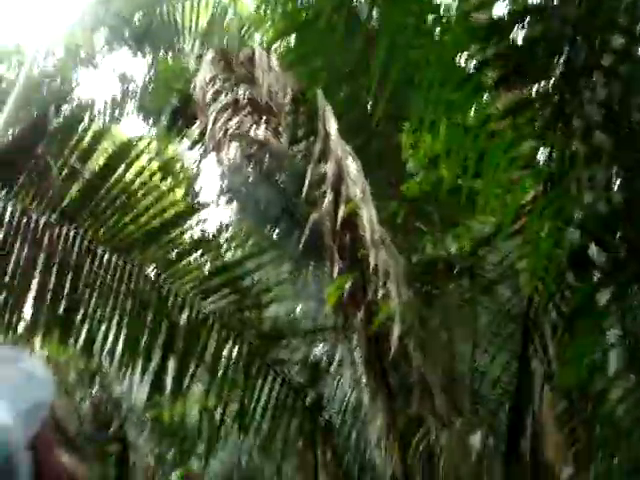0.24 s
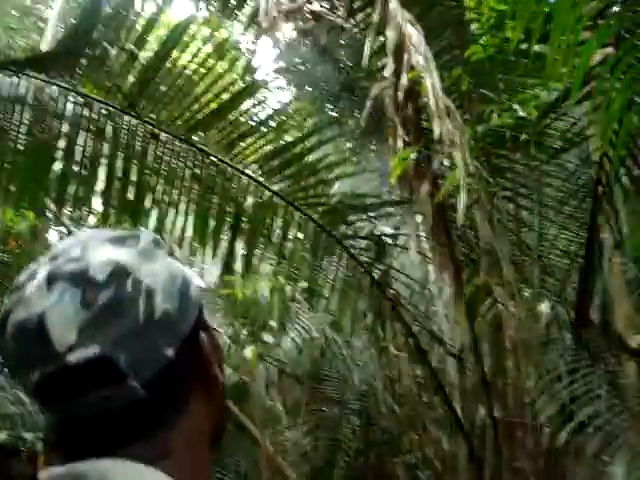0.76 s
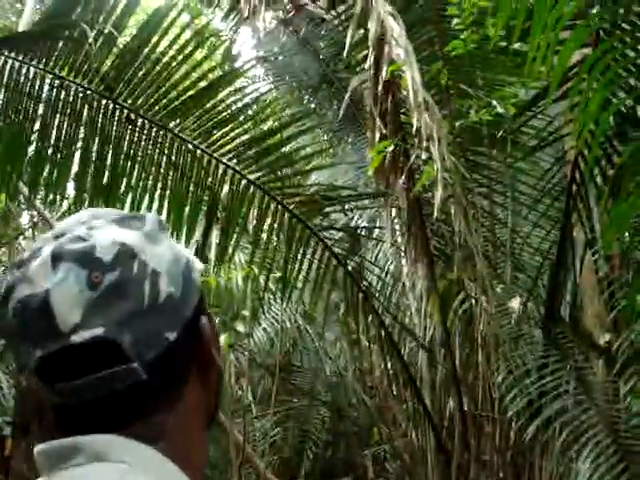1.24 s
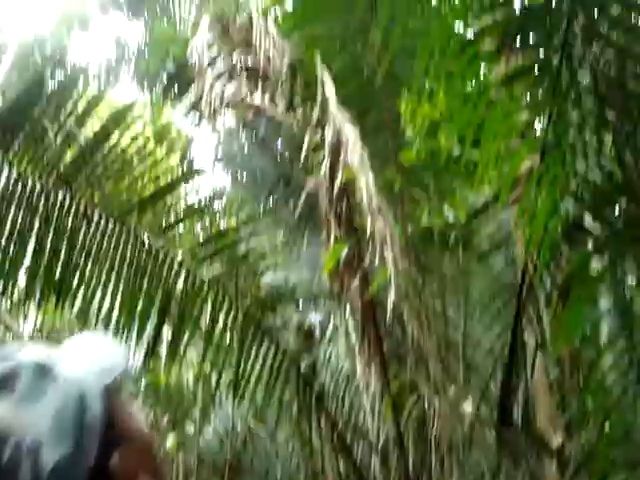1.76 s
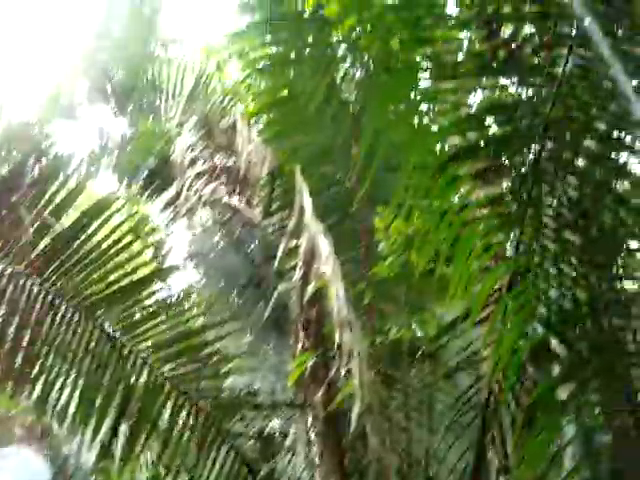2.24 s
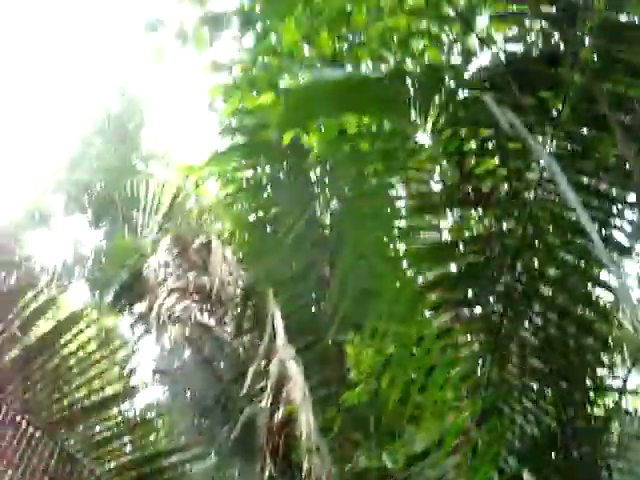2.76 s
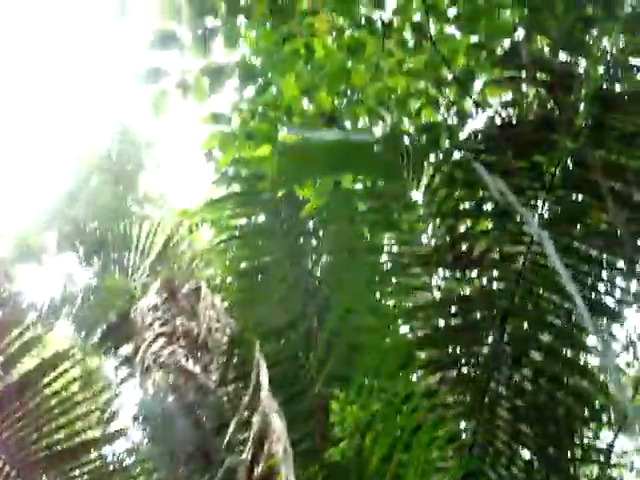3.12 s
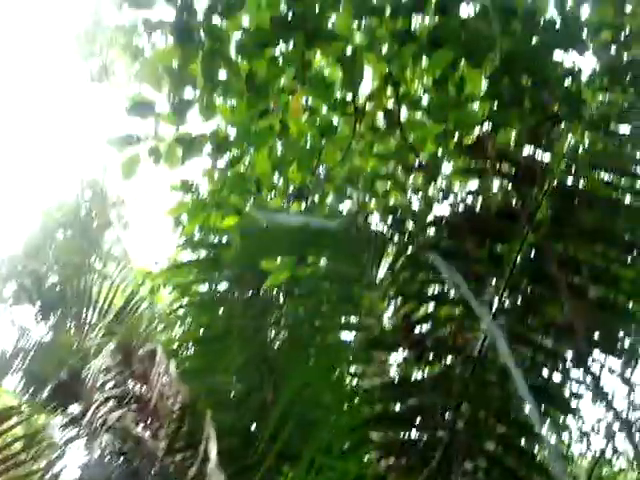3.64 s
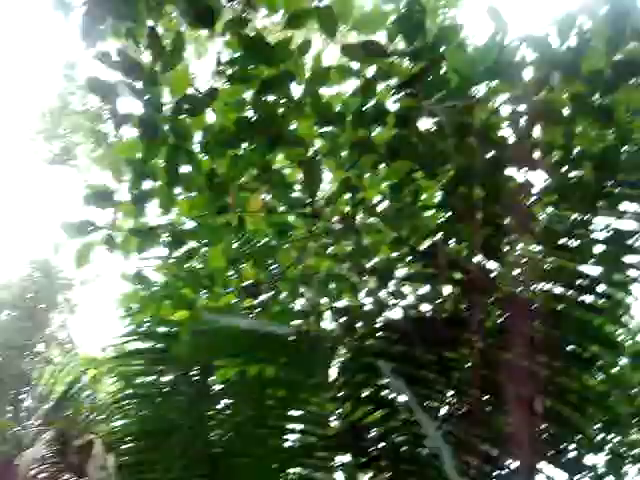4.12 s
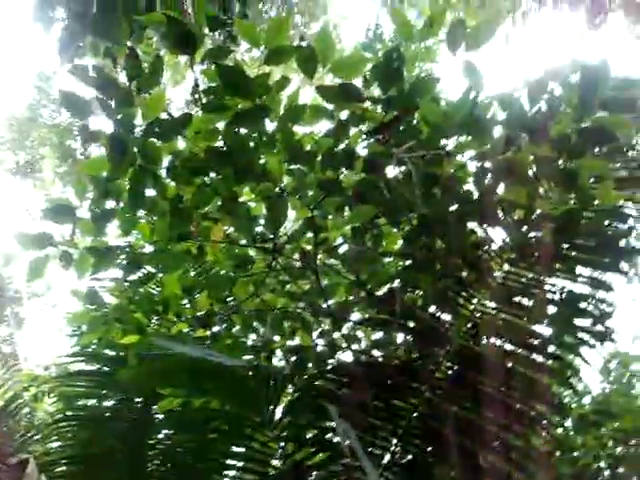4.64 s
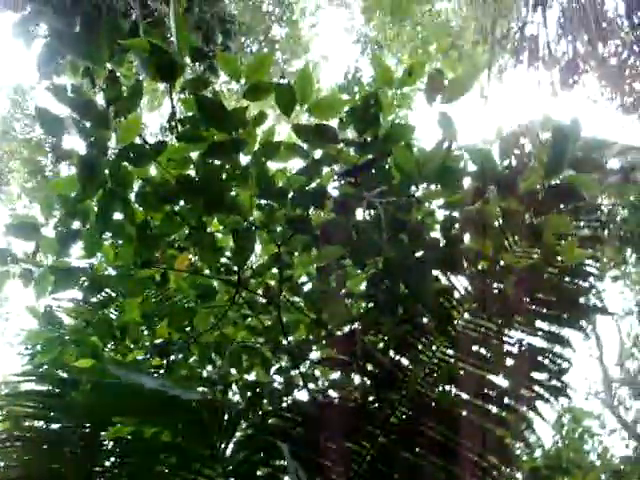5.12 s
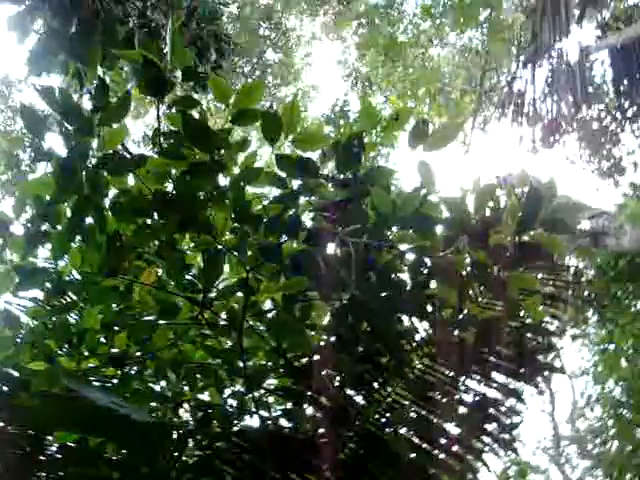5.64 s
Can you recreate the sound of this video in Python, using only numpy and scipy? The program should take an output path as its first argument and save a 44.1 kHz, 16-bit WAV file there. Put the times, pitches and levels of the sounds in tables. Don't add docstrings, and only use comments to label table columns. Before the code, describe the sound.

Outdoors in dense jungle, a small handheld camera catches the tail of a howler monkey roar, then whistling bird notes over close leaf rustle and twig snaps. Low moans and a rough gasp lead to hoarse barks and clear hoots; after a brief dip, a long gravelly roar builds to the end over loud cracks and handling bumps.

```python
import sys
import numpy as np
from scipy import signal
from scipy.io import wavfile
from scipy.ndimage import uniform_filter1d, minimum_filter1d

SR = 44100
rng = np.random.default_rng(int(sys.argv[2]) if len(sys.argv) > 2 else 0)


def voltage_ratio(decibels):
    exponent = np.asarray(decibels, float) / 20
    return 10 ** exponent


def log_audio(samples):
    frames = np.atleast_2d(samples).T
    limited = np.clip(frames, -1, 1)
    pcm = np.round(limited * 32767).astype(np.int16)
    wavfile.write(sys.argv[1], SR, pcm)


N = 259370
T = np.arange(N) / SR

# (time [s], frequency [Hz])
SAC_HZ = [(2.95, 700), (3.5, 720), (4.1, 756), (5.0, 750), (5.6, 744.5), (5.88, 797)]


def evened(x):
    return x / np.sqrt(np.mean(x ** 2) + 1e-20)


def read(points, hz):
    f, value = np.transpose(points)
    return np.interp(np.log(hz + 1), np.log(f + 1), value)


def played(rows):
    s, *columns = np.transpose(rows)
    span = slice(max(round(s[0] * SR), 0), min(round(s[-1] * SR), N))
    since_start_s = T[span] - s[0] + (s[0] < .01)
    to_end_s = s[-1] - T[span] + (s[-1] > T[-1] - .01)
    ends = np.clip(np.minimum(since_start_s, to_end_s) / .015, 0, 1)
    return span, ends, [np.interp(T[span], s, c) for c in columns]


def held(start_s, length_s, rise, fall, *columns):
    return np.transpose([start_s + length_s * np.array([0, rise, 1 - fall, 1]), *columns])


def swells(events, rest_db):
    return rest_db + sum(rise_db * np.exp(-((T - s) / width_s) ** 2) for s, width_s, rise_db in events)


def wobble(count, size):
    return evened(uniform_filter1d(uniform_filter1d(rng.standard_normal(count), size), size))


def coloured(points, patchy_db):
    frames, hz = N // 128 + 5, np.fft.rfftfreq(512, 1 / SR)
    a, b, patches = rng.standard_normal((frames, 257, 3)).T
    patches = evened(uniform_filter1d(uniform_filter1d(patches, 5, 0), 24, 1))
    z = (a + 1j * b) * voltage_ratio(read(points, hz)[:, None] + patchy_db * patches)
    return evened(signal.istft(z, nperseg=512, noverlap=384)[1][:N])


def resonate(x, hz, width_hz):
    r = np.exp(-np.pi * width_hz / SR)
    if np.ndim(hz) == 0:
        return 2 * signal.lfilter([1 - r], [1, -r * np.exp(2j * np.pi * hz / SR)], x).real
    turn = np.exp(2j * np.pi * np.cumsum(hz) / SR)
    return 2 * (turn * signal.lfilter([1 - r], [1, -r], x / turn)).real


def highpass(x, order, hz):
    return signal.sosfilt(signal.butter(order, hz, "high", fs=SR, output="sos"), x)


def folds(count, rate_hz, jitter, puff):
    turns = np.cumsum(rate_hz * np.exp(jitter * wobble(count, size=150))) / SR
    pulses = np.diff(np.floor(turns), prepend=0) * voltage_ratio(2.75 * rng.standard_normal(count))
    puffs = (0.56 + np.exp(-(turns % 1) / 0.43)) * rng.standard_normal(count)
    return evened((1 - puff) * evened(pulses) + puff * evened(puffs))


def voice(span, effort, bright_db, low_mouth, high_mouth, throat, rate_hz, puff):
    drive = folds(len(effort), rate_hz=rate_hz, jitter=.5, puff=puff)
    low, high, out, split_hz = 0, 0, np.zeros(N), 2850
    for hz, width_hz, db in throat:
        at_hz = hz * (low_mouth if hz < split_hz else high_mouth)
        mode = voltage_ratio(db) * resonate(resonate(drive, at_hz, 1.25 * width_hz), at_hz, 2.2 * width_hz)
        if hz < split_hz:
            low = low + mode
        else:
            high = high + mode
    unsteady = voltage_ratio(0.69 * wobble(len(effort), size=600))
    out[span] = effort * unsteady * (evened(low) + voltage_ratio(bright_db) * evened(high))
    return out


def barks():
    # (full voice [s], effort [dB], hold [s], mouth opening [factor on throat], brightness [dB])
    bark_rows = [
        (0.0, -18.5, .06, 1.045, -16),
        (0.2, -38, .09, 0.985, -20),
        (2.21, -46.5, .05, 0.94, -20),
        (2.437, -24.5, 0.024, 0.99, -20),
        (3.007, -21, .05, .99, -18.5),
        (3.259, -21, .075, 0.96, -18),
        (3.4, -29, 0.019, 1.0, -24),
        (3.54, -20.5, .09, 0.96, -19),
        (3.771, -26.5, 0.028, 1.09, -16),
        (3.9, -19, 0.089, .97, -19),
    ]
    # (resonance [Hz], width [Hz], level [dB])
    bark_throat = [(351, 54, -14.5), (533.7, 41.6, -4.5), (720, 191, -1), (933, 103, -7), (1164, 133, 0.5),
                   (1367, 180, -6.5), (1634, 66, -1), (1990, 100, -6.5), (2346, 110, -10.5),
                   (2540, 69, -24), (3265, 60, -9.5), (3645, 78, -20.5), (4326, 47, -16.5), (5170, 64, -24)]
    rise_s, fall_s, ends_db = .065, .16, -26.5
    out = np.zeros(N)
    for s, db, hold_s, mouth, bright_db in bark_rows:
        rows = [(s - rise_s, db + ends_db), (s, db), (s + hold_s, db), (s + hold_s + fall_s, db + ends_db)]
        span, ends, (effort_db,) = played(rows)
        high_mouth = max(mouth - .035, .985)
        out += voice(span, ends * voltage_ratio(effort_db), bright_db, mouth, high_mouth, bark_throat, rate_hz=110, puff=0.54)
    return out


def leaves():
    # (middle [s], width [s], rise [dB])
    strokes = [
        (0.0, 0.34, 7.5),
        (0.62, .25, 5.5),
        (1.05, 0.17, 7.5),
        (1.6, 0.13, 7),
        (2.6, .2, 2),
        (3.19, 0.15, 8),
        (3.65, 0.41, 7),
        (4.9, .25, 9.5),
        (5.32, 0.25, 11),
        (5.88, .08, 5.5),
    ]
    # (frequency [Hz], density [dB per Hz])
    leaf_spectrum = [(180, -32.5), (300, -1), (531, -21), (732, -30), (912, -1), (1370, -9), (3990, -4),
                     (9890, -13), (12900, -44.5), (21800, -120)]
    level_db = swells(strokes, rest_db=-58.5)
    grains = voltage_ratio(2.7 * np.minimum(rng.exponential(1, N), 5)) * (rng.random(N) < 350 / SR)
    grains = evened(signal.lfilter([1], [1, -.985], grains))
    hiss = coloured(leaf_spectrum, patchy_db=.8)
    return voltage_ratio(level_db + 6.5) * hiss * evened(1 + 0.46 * grains)


def rumble():
    # (middle [s], width [s], rise [dB])
    puff_rows = [
        (0.0, .1, 21),
        (0.36, .15, 12),
        (1.76, 0.11, 9.9),
        (2.5, 0.47, 14),
        (3.15, 0.28, 13),
        (3.88, 0.25, 11),
        (4.7, .3, 12),
        (5.08, 0.2, 18),
        (5.88, 0.12, 21),
    ]
    lumps = coloured([(30, 3), (80, -6.0), (150, 13), (260, 10.5), (500, -46), (900, -86.5)], patchy_db=2.0)
    return voltage_ratio(swells(puff_rows, rest_db=-74.5)) * lumps


def air():
    # (frequency [Hz], density [dB per Hz])
    hush_spectrum = [(15, -72), (25, -38), (97, -22.5), (155, -35.5), (210, -1.5), (355, 2), (402, -26),
                     (456, 3.5), (2100, -8), (2320, -10), (9890, -37), (12900, -52.5), (21800, -120)]
    return voltage_ratio(-53.0) * coloured(hush_spectrum, patchy_db=3.0)


def bumps():
    # (time [s], peak [dB])
    bump_rows = [(2.976, -44), (3.947, -39), (3.978, -32.5), (4.699, -42), (4.724, -29), (4.889, -33),
                 (5.059, -37), (5.839, -35.5), (0.01, -33.5), (4.84, -41), (5.13, -40), (5.19, -45),
                 (5.29, -43), (5.45, -49)]
    out, t = np.zeros(N + SR), np.arange(12000) / SR
    u = t / 0.0012
    push = u * (2 - u) * np.exp(-u)
    for s, peak_db in bump_rows:
        out[round(s * SR):][:len(t)] += voltage_ratio(peak_db + 5.0) * push
    return out[:N]


def bird():
    # (start [s], glide [s], first pitch [Hz], held pitch [Hz], level [dB])
    notes_held = [
        (0.18, .09, 3260, 3640, -45.5),
        (0.745, 0.052, 2800, 3100, -38),
        (0.935, .15, 2044, 2760, -41),
        (1.235, .15, 4180, 3540, -39.5),
        (1.575, .03, 2790, 2260, -40.5),
    ]
    # (start [s], glide [s], first pitch [Hz], last pitch [Hz], level [dB])
    slurs = [
        (0.485, .14, 4120, 4290, -45),
        (1.452, .085, 2450, 3896, -39.5),
    ]
    hold_s, slur_hold_s = 0.12, .012
    start_db, fade_db, tremble_db = -3.5, -17.5, 2.5
    out = np.zeros(N)
    holds_s = [hold_s] * len(notes_held) + [slur_hold_s] * len(slurs)
    for (s, glide_s, first_hz, held_hz, db), stay_s in zip(notes_held + slurs, holds_s):
        rows = [(s, 0, start_db), (s + glide_s, 1, 0), (s + glide_s + stay_s, 1, fade_db)]
        span, ends, (u, level_db) = played(rows)
        if stay_s > slur_hold_s:
            u = np.sin(np.pi * u / 2) ** (1 if held_hz > first_hz else 2)
        hz = first_hz + (held_hz - first_hz) * u
        level_db = db + level_db + tremble_db * wobble(len(u), size=300)
        out[span] += voltage_ratio(level_db + 2.5) * ends * np.sin(2 * np.pi * np.cumsum(hz) / SR)
    return out


def moans():
    # (start [s], length [s], first pitch [Hz], last pitch [Hz], level [dB])
    moan_rows = [(0.198, 0.11, 334.4, 329.6, -39.5), (2.196, 0.093, 269, 244, -42.5),
                 (2.422, 0.049, 343, 334, -32.5), (2.573, 0.12, 284.7, 333.7, -31),
                 (2.7, .08, 419.4, 415, -35), (2.789, .11, 333, 352, -32), (2.898, .065, 397, 403, -33.5),
                 (4.076, 0.27, 377.6, 365, -43.5), (4.938, 0.24, 384.6, 350, -28.5),
                 (5.792, .1, 319, 324, -36), (0.681, .22, 1625, 1600, -53), (1.179, .18, 1380, 1340, -52)]
    ends_db = -8.5
    out = np.zeros(N)
    for s, length_s, first_hz, last_hz, db in moan_rows:
        rows = held(s, length_s, 0.26, .25, np.linspace(first_hz, last_hz, 4),
                    db + ends_db * np.array([1, 0, 0, 1]))
        span, ends, (hz, level_db) = played(rows)
        turns = np.cumsum(hz * (1 + 0.011 * wobble(len(hz), size=250))) / SR
        tone = sum(voltage_ratio(-11.0 * k) * np.cos(2 * np.pi * (k + 1) * turns) for k in range(3))
        out[span] += voltage_ratio(level_db + 3.95 * wobble(len(hz), size=500)) * ends * evened(tone)
    return out


def snaps():
    # (time [s], peak [dB], ring pitch [Hz], tail t60 [s])
    snap_rows = [(0.2732, -29, 1090, .23), (0.2971, -34, 3520, 0.27), (0.633, -28, 2000, 0.017),
                 (0.6562, -36, 1890, .14), (0.8705, -28.5, 3060, 0.027), (0.9373, -29, 3140, 0.17),
                 (1.1116, -33.5, 2760, 0.37), (1.507, -33, 2720, .3), (1.6985, -38.5, 2260, .09),
                 (2.0702, -32.5, 3010, 0.65), (2.514, -36, 1270, .3), (2.9746, -43.5, 1520, 0.37),
                 (3.1881, -31, 1130, 0.17), (3.6504, -28, 2170, 0.17), (4.5406, -31, 1165, 0.046),
                 (4.5765, -25, 1120, .14), (4.607, -29, 1240, 0.14), (4.6591, -23, 1180, 0.1),
                 (4.7044, -17, 1690, .09), (4.723, -19.5, 1620, 0.17), (4.8344, -15.5, 1620, 0.2),
                 (4.8972, -22, 1195, 0.18)]
    # (time [s], peak [dB], ring pitch [Hz], tail t60 [s])
    knocks = [
        (0.796, -38, 450, .03),
        (0.868, -37, 670, .03),
        (1.667, -43.5, 1220, .03),
    ]
    out, t = np.zeros(N + SR), np.arange(12000) / SR
    noise = rng.standard_normal((len(snap_rows + knocks), len(t)))
    noise = signal.lfilter([1], [1, -.45], noise)
    rings_db = [-3] * len(snap_rows) + [4] * len(knocks)
    for (s, peak_db, hz, t60_s), ring_db, grain in zip(snap_rows + knocks, rings_db, noise):
        tail = 0.35 * voltage_ratio(-60 * t / np.clip(t60_s, .03, .35))
        crack = grain * (0.69 * voltage_ratio(-60 * t / 0.0041) + tail)
        ring = np.sin(2 * np.pi * hz * t) * voltage_ratio(ring_db - 60 * t / 0.029)
        out[round(s * SR):][:len(t)] += voltage_ratio(peak_db + 2.0) * (crack + 1.07 * ring)
    return highpass(out, 2, 450)[:N]


def far_troop():
    # (time [s], level [dB])
    murmur = [(0.4, -48.5), (1.39, -51), (1.81, -61), (2.27, -45.5), (2.4, -57)]
    span, ends, (level_db,) = played(murmur)
    drive = rng.standard_normal(len(ends))
    modes = [(482, 130, -2.5), (700, 380, 2.5), (1245, 410, 7), (1620, 230, -6.0)]  # (Hz, width Hz, dB)
    throat = sum(voltage_ratio(db) * resonate(drive, hz, width_hz) for hz, width_hz, db in modes)
    out = np.zeros(N)
    swell = voltage_ratio(1.5 * wobble(len(ends), size=1500))
    out[span] = voltage_ratio(level_db) * ends * evened(throat) * swell
    return out


def gasp():
    # (time [s], level [dB])
    gasp_level = [(2.57, -46), (2.7, -30), (2.87, -44.5), (2.95, -51.5)]
    # (resonance [Hz], width [Hz], level [dB])
    gasp_throat = [(471, 100, -4), (835, 78, 2.5), (1476, 99, -0.5), (1876, 73, -6), (2590, 74, -19),
                   (3150, 50, -19), (4150, 62, -26)]
    out = np.zeros(N)
    span, ends, (level_db,) = played(gasp_level)
    drive = folds(len(ends), rate_hz=150, jitter=0.36, puff=0.52)
    throat = 0
    for hz, width_hz, db in gasp_throat:
        throat = throat + voltage_ratio(db) * evened(resonate(resonate(drive, hz, width_hz), hz, 2 * width_hz))
    out[span] += voltage_ratio(level_db) * ends * throat
    return out


def sac_ring(locked):
    # (time [s], level [dB])
    ring_level = [(3.4, -34), (3.5, -22), (3.84, -28.5), (3.96, -14.5), (4.09, -34.5), (4.88, -23.5),
                  (4.98, -14.5), (5.57, -16.5), (5.6, -20), (5.88, -18.5)]
    out = np.zeros(N)
    span, ends, (level_db,) = played(ring_level)
    hz = np.interp(T[span], *np.transpose(SAC_HZ))
    drive = folds(len(hz), rate_hz=60, jitter=.6, puff=0.7)
    ring = evened(resonate(resonate(drive, hz, 45), hz, 120))
    ring /= (uniform_filter1d(ring ** 2, size=240) + .05) ** .19
    ring = resonate(ring, hz, 77)
    out[span] = voltage_ratio(level_db - 15.8 * locked[span]) * ends * evened(ring)
    return out


def hoots():
    # (start [s], length [s], pitch [Hz], sag [Hz], level [dB])
    hoot_rows = [
        (3.46, .16, 698, -30, -16.5),
        (3.645, .15, 716, 33, -12),
        (3.942, 0.085, 734, -4.5, -11.5),
        (4.13, 0.219, 762, 14, -25),
        (3.792, 0.029, 717, -5, -9.5),
    ]
    # (multiple [-], level [dB])
    overtones = [
        [(1, 1), (2, -13), (3, -14), (4, -45.5), (5, -40.5), (6, -36), (10, -41.5)],
        [(1, 2.5), (2, -13), (3, -18.5), (4, -25), (5, -29.5), (6, -36), (12, -48.5)],
        [(1, 1), (2, -19.5), (3, -27)],
        [(1, -0.5), (2, -10.5), (3, -16.5)],
        [(1, 0), (2, -15), (3, -18.5), (4, -31.5)],
    ]
    ends_db, rasp_db = -9.5, 7
    out, locked = np.zeros(N), np.zeros(N)
    for (s, length_s, edge_hz, sag_hz, db), partials in zip(hoot_rows, overtones):
        last_hz = np.interp(s + length_s, *np.transpose(SAC_HZ))
        rows = held(s, length_s, 0.24, 0.19, [edge_hz, edge_hz - .93 * sag_hz, edge_hz - sag_hz, last_hz],
                    db + ends_db * np.array([1, 0, 0, 1]), rasp_db * np.array([1, 0.35, 0.0, 0.89]))
        span, soft, (hz, hoot_db, over_db) = played(rows)
        turns = np.cumsum(hz * (1 + 0.0053 * wobble(len(hz), size=200))) / SR
        for k, partial_db in partials:
            uneven_db = over_db * (k > 1.5) + 1.1 * (k - 1) * wobble(len(hz), size=700)
            level = voltage_ratio(hoot_db + 2.5 + partial_db + uneven_db)
            out[span] += level * soft * np.cos(2 * np.pi * k * turns + k)
        locked[span] = soft
    return out, locked


def roar():
    # (time [s], effort [dB], brightness [dB])
    roar_effort = [(4.0, -22.5, -10.5), (4.12, -33.5, -15), (4.45, -28.5, -27.5), (4.7, -24.5, -25.5),
                   (4.93, -19, -19.5), (5.23, -16, -14.5), (5.56, -19, -15.5), (5.6, -20.5, -15.5),
                   (5.88, -14.5, -16.5)]
    # (time [s], mouth opening [factor on upper throat])
    roar_mouth = [(4.0, 1.01), (5.0, 1.03), (5.55, 1.008), (5.88, 1.04)]
    # (resonance [Hz], width [Hz], level [dB])
    roar_throat = [(517, 16, -8), (605, 205, -11), (960, 85, -6.5), (1167, 76, -2.5), (1530, 89, -5.5),
                   (1628, 61, -5), (1930, 71, -10.5), (2105, 42, -6), (2260, 53, -8), (2352, 42, -9),
                   (3138, 96, -10), (3637, 43, -15.5), (3850, 86, -21.5), (4694, 56, -22.5),
                   (6400, 110, -32), (6800, 210, -26), (7230, 380, -33)]
    span, ends, (effort_db, bright_db) = played(roar_effort)
    mouth = np.interp(T[span], *np.transpose(roar_mouth))
    low_mouth = 1 + 0.014 * wobble(len(mouth), size=5000)
    out = voice(span, ends * voltage_ratio(effort_db), bright_db, low_mouth, mouth, roar_throat, rate_hz=70, puff=0.56)
    return highpass(out, 2, 400)


def forest(x):
    # (frequency [Hz], t60 [s])
    decay = [(300, 0.8), (1000, 0.59), (3000, 0.68), (8000, 0.41)]
    taps = np.zeros(SR)
    at = np.arange(400, SR - 20, 20)
    taps[at + rng.integers(0, 20, len(at))] = rng.choice([-1., 1.], len(at))
    hz, t, z = signal.stft(taps, SR, nperseg=256)
    tail = signal.istft(z * voltage_ratio(-60 * t / read(decay, hz)[:, None]), SR, nperseg=256)[1]
    return signal.fftconvolve(x, tail / np.linalg.norm(tail))[:N]


def scene():
    hoot, locked = hoots()
    monkeys = barks() + moans() + gasp() + sac_ring(locked) + hoot + roar()
    monkeys = highpass(monkeys, 4, 230)
    song = bird()
    echoes = forest(voltage_ratio(-10) * monkeys + voltage_ratio(-3) * song)
    far = voltage_ratio(-2.0) * monkeys + voltage_ratio(-5.5) * song + echoes + far_troop()
    near = leaves() + rumble() + bumps() + snaps()
    return (far + near + air())[None]


def top_cut(x):
    return signal.sosfilt(signal.butter(12, 10040, fs=SR, output="sos"), x)


def record(dry):
    thin = highpass(dry, 1, 70)
    cut = signal.oaconvolve(thin, signal.firwin(511, 10080, window=("kaiser", 9), fs=SR)[None], "same")
    treble = signal.oaconvolve(cut, signal.firwin(255, 5200, pass_zero=False, fs=SR)[None], "same")
    power = uniform_filter1d(treble ** 2, size=160)
    ahead = -minimum_filter1d(-power, size=800, origin=-399)
    lost = uniform_filter1d((power < voltage_ratio(-2 * 12) * ahead) * 1., size=48)
    return top_cut(cut - lost * treble)


dry = scene()
out = record(dry)
log_audio(out)
```